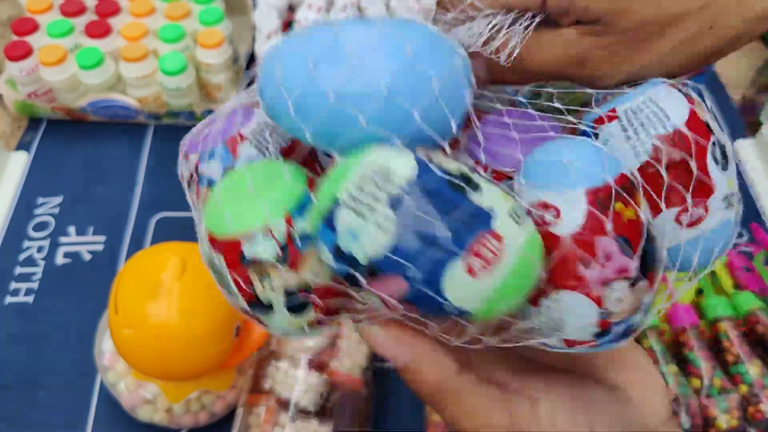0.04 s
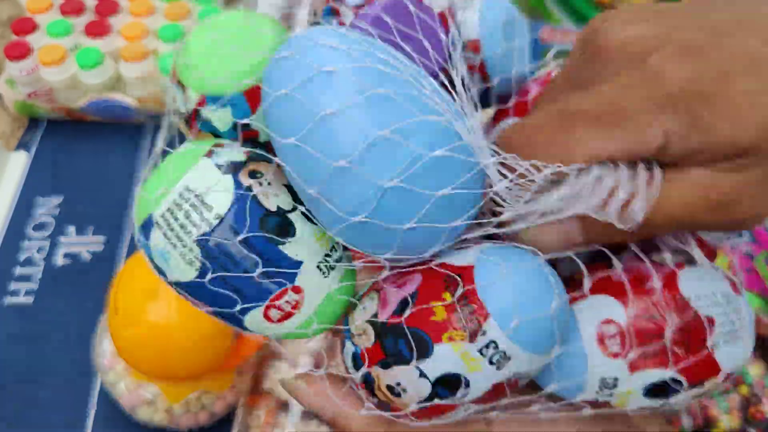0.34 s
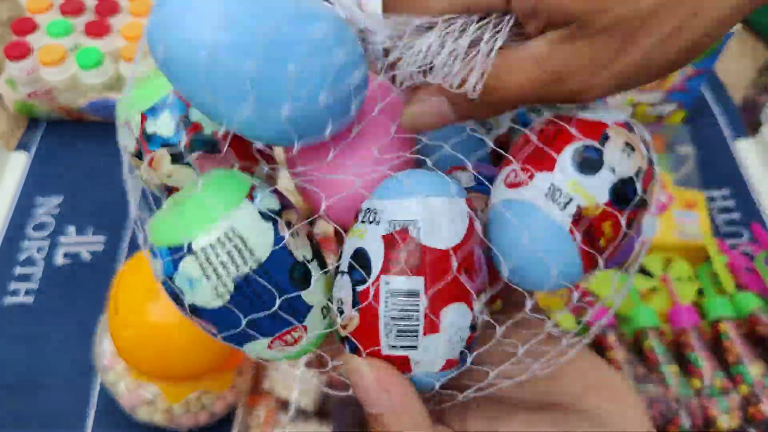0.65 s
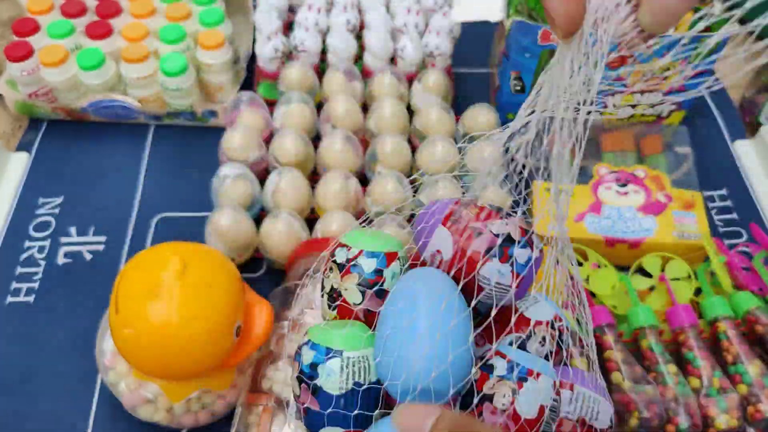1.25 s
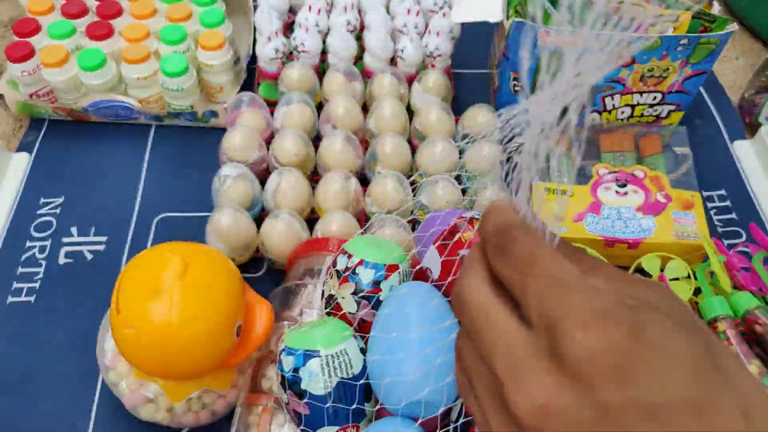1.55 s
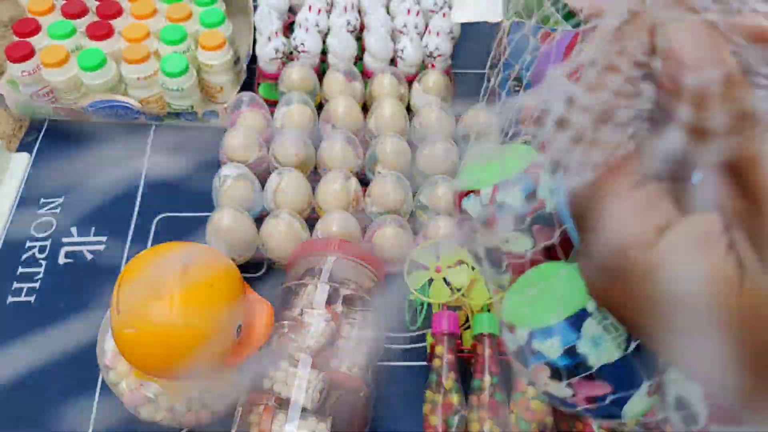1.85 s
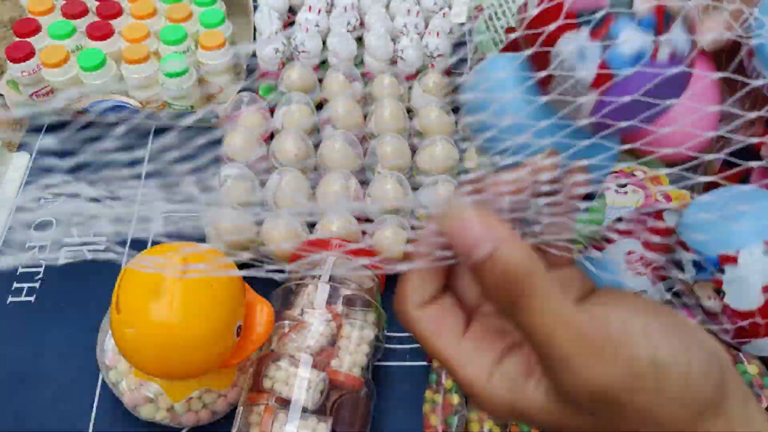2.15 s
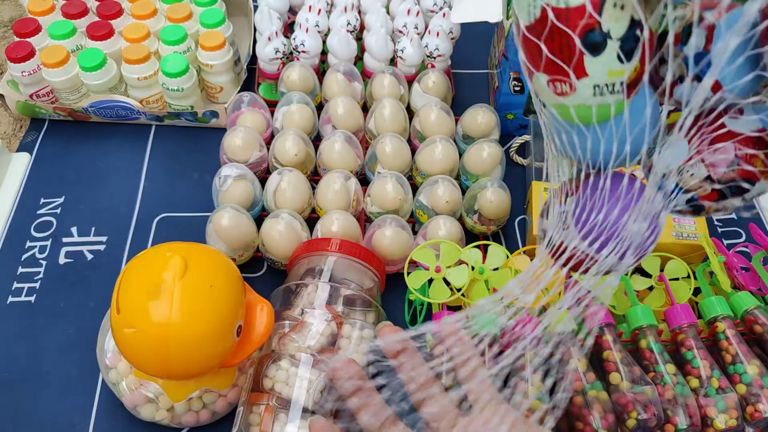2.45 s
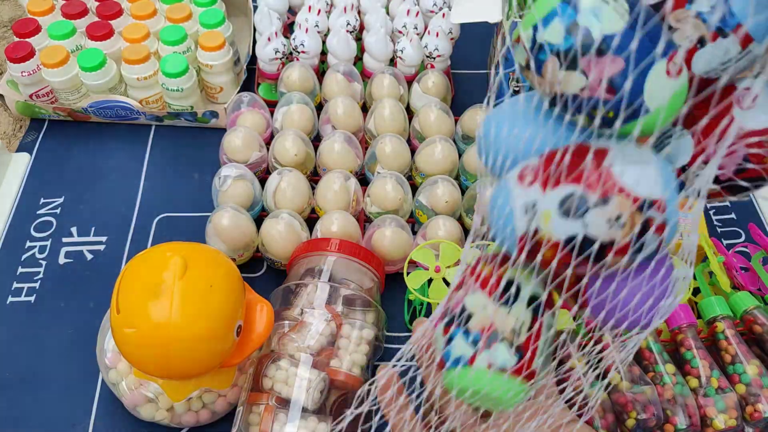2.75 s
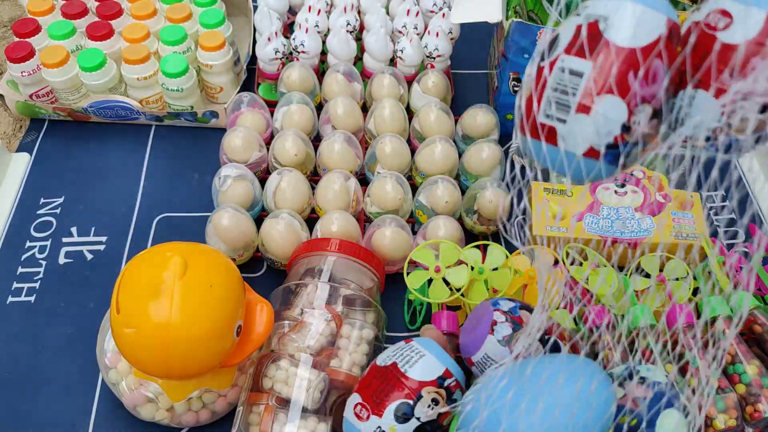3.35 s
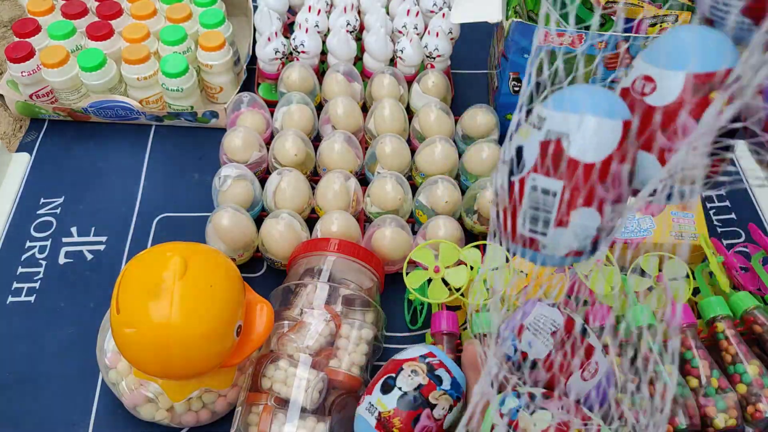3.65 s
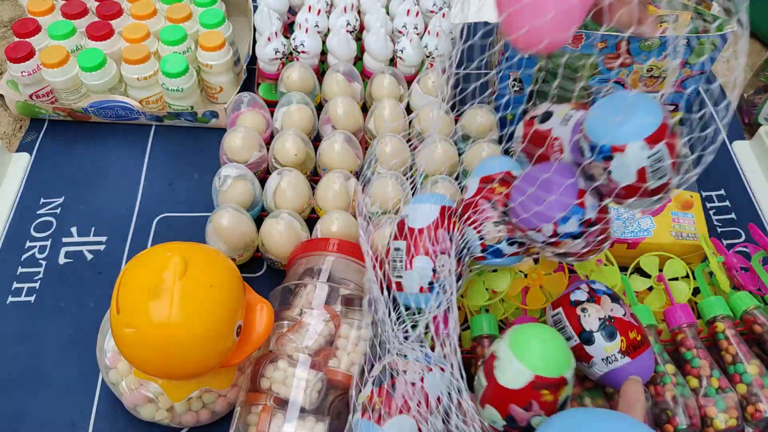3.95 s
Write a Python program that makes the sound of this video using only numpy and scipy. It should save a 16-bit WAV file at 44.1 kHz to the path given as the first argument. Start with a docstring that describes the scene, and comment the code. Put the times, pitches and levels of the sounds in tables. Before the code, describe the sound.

Hollow plastic eggs clack and rattle in a rustling mesh bag, close up in a quiet room. The knocking is densest and loudest for the first 0.8 seconds, with soft bumps underneath. Another short rustle comes around 1.2 seconds, then a lull. From about 1.9 seconds, lighter clicks and crackling mesh continue, with a sharper clack and scrape near 3.5 seconds and faint squeaks until 4 seconds.

```python
"""Plastic eggs in a mesh bag

Hollow plastic eggs are jostled close to the microphone, set down, then lifted and shaken down the net.
Shells clack, rattle and squeak against each other; mesh and wrappers scrape and crackle over them in
tiny slips. The bag bumps softly against hands and table in a quiet room."""
import sys
import numpy as np
from scipy import signal
from scipy.fft import rfft, irfft
from scipy.io import wavfile
from scipy.ndimage import uniform_filter1d

SR = 44100
rng = np.random.default_rng(int(sys.argv[2]) if len(sys.argv) > 2 else 0)


def materialize(psi):
    """Save the field psi as 16-bit PCM at rate SR to the path in sys.argv[1].

    A 1-D psi becomes a single channel; in a 2-D psi each row is a channel.
    """
    bounded = np.clip(np.atleast_2d(psi).T, -1, 1)
    quanta = np.round(bounded * 32767).astype(np.int16)
    wavfile.write(sys.argv[1], SR, quanta)


N = 176400

# Shell-on-shell hits: start_s, shell_db, pitch_hz, thud_db, tick_db
CLACKS = [(0.0176, -28, 1720, -48, -39), (0.0255, -28, 2900, -43, -31), (0.0351, -30, 2660, -45, -34),
          (0.0712, -19, 2240, -29, -16.5), (0.0964, -24.5, 1870, -27, -25.5), (0.1536, -24, 2220, -41, -34),
          (0.1607, -17.5, 2100, -29, -16.5), (0.1668, -29, 1720, -25, -25), (0.1841, -19.5, 1640, -26, -18),
          (0.1907, -21, 1730, -28.5, -22.5), (0.2484, -25, 2220, -36, -21), (0.2652, -16.5, 1610, -19, -21),
          (0.2755, -18.5, 2840, -18.5, -18), (0.3032, -30, 3430, -29, -28), (0.3562, -25, 3370, -31, -22.5),
          (0.372, -24, 1550, -32, -20), (0.3825, -25, 2160, -23.5, -32), (0.4249, -34, 3150, -54, -24.5),
          (0.4447, -23.5, 2280, -37, -21.5), (0.4579, -20.5, 2980, -28, -26),
          (0.4931, -24.5, 2430, -26, -26), (0.5084, -25, 1700, -41, -23), (0.5563, -22, 2270, -23, -21),
          (0.577, -21.5, 2280, -25, -18), (0.6004, -26.5, 3400, -35, -33), (0.6227, -33, 2690, -33, -16.5),
          (0.6383, -36, 1930, -50, -21), (0.65, -25, 3100, -36, -29), (0.663, -26, 1500, -28, -34),
          (0.6719, -18, 2200, -30, -32), (0.6778, -28, 1250, -24.5, -38), (0.7128, -20.5, 1740, -24.5, -25),
          (0.7663, -18, 1950, -23.5, -20), (0.7757, -20, 1674, -28, -22), (0.8313, -33.5, 2560, -50, -29),
          (0.8468, -34, 3160, -48, -26), (0.9521, -27.5, 1764, -37.5, -28.5),
          (0.9612, -34, 1640, -38.5, -38), (0.9768, -35, 1820, -37, -48), (1.0106, -30, 2150, -37, -32),
          (1.1034, -32, 3160, -40, -31), (1.153, -33, 3200, -47, -30), (1.1785, -42, 3180, -48, -37),
          (1.3394, -31, 2620, -38, -34.5), (1.4912, -35.5, 2210, -48, -36.5),
          (1.9275, -44, 1850, -40.5, -38), (1.969, -37, 2840, -55, -39), (2.0551, -35.5, 1380, -42, -34),
          (2.1036, -33, 2080, -34, -41), (2.211, -31.5, 2050, -55, -32.5), (2.3458, -34, 1555, -47, -46),
          (2.5078, -51, 1600, -58, -35.5), (2.6495, -32.5, 2910, -34, -32.5),
          (2.7166, -30.5, 1010, -41, -34.5), (2.7376, -28.5, 1090, -36.5, -46),
          (2.7749, -36, 1970, -33.5, -48), (2.8432, -40, 1710, -35.5, -51), (2.9214, -30, 2820, -57, -31.5),
          (2.9356, -25, 2250, -45, -29), (2.9497, -52, 1700, -53, -30.5), (2.9779, -34, 1970, -53, -40),
          (2.9898, -33.5, 1670, -35.5, -34.5), (3.0602, -28.5, 2200, -31.5, -33.5),
          (3.1282, -33.5, 3220, -36, -35.5), (3.1451, -39, 3100, -52, -34.5),
          (3.159, -30.5, 2765, -38, -37), (3.1963, -41.5, 1690, -42.5, -44), (3.227, -38, 2690, -48, -43),
          (3.2614, -38, 1970, -46.5, -39.5), (3.3953, -31, 3070, -45.5, -36), (3.4724, -22, 2100, -48, -37),
          (3.841, -34, 2960, -50, -34.5), (3.8704, -39, 3250, -47, -40), (3.8889, -41.5, 3300, -55, -40),
          (3.919, -42, 2000, -62, -36.5)]
# Modes of a hollow egg: pitch_ratio, level_db, t60_s
EGG_MODES = [(.71, -6, .022), (.86, -8, 0.018), (1, 5, .023), (1.24, -10, .018), (1.47, -13, .016),
             (1.75, -15, .014)]
# Fader rides for the sliding load: time_s, shells_db, mesh_db
SLIDE_LEVELS = [(0.0, -42.5, -40), (0.03, -35, -37.5), (0.06, -36.5, -34), (0.08, -26, -30),
                (0.14, -38, -39.5), (0.27, -21, -21.5), (0.32, -28.5, -33), (0.38, -24, -24.5),
                (0.41, -34.5, -35), (0.45, -23, -23), (0.52, -32, -33), (0.54, -24.5, -25),
                (0.61, -28, -29), (0.64, -27, -23), (0.66, -29, -31), (0.75, -29, -30),
                (0.78, -24.5, -28.5), (0.83, -41, -43), (0.87, -36, -34.5), (0.92, -42, -43),
                (0.95, -41, -42), (1.0, -48, -50), (1.08, -50, -47), (1.1, -49, -52), (1.14, -57, -63),
                (1.242, -26.5, -29.5), (1.37, -36, -40), (1.41, -48, -50.5), (1.49, -47, -56),
                (1.62, -70, -65), (1.689, -55.5, -52), (1.73, -66.5, -70.5), (1.911, -68, -69),
                (1.931, -48, -49.5), (1.98, -43.5, -45), (2.05, -41, -49.5), (2.06, -34, -35),
                (2.14, -38.5, -40), (2.37, -42, -39.5), (2.47, -43, -40.5), (2.71, -51, -47),
                (2.72, -40.5, -43), (3.07, -42.5, -42), (3.12, -48.5, -44), (3.17, -44, -43),
                (3.19, -50, -53), (3.38, -59, -53), (3.41, -40.5, -41.5), (3.46, -45, -46),
                (3.49, -34, -32.5), (3.522, -33, -31), (3.55, -56, -56), (3.61, -44, -45.5),
                (3.63, -60, -52.5), (3.68, -56, -55), (3.721, -41, -42.5), (3.76, -48, -49),
                (3.86, -43, -47), (3.89, -54, -64), (3.94, -43.5, -40), (4.0, -64, -56)]
# Single strands snapping over a shell: start_s, pitch_hz, level_db
STRAND_SNAPS = [(.8438, 6500, -17), (.8635, 7000, -23), (1.1422, 7000, -22), (2.1505, 6000, -27),
                (2.405, 9500, -21), (2.5585, 5000, -27), (2.961, 5200, -21), (3.2665, 7500, -27),
                (3.858, 6000, -26)]
# The bag landing on hands and table: start_s, length_s, pitch_hz, level_db
BAG_BUMPS = [(0.079, .03, 205, -36), (.175, 0.014, 263, -28.5), (.25, 0.054, 282, -35),
             (0.362, .03, 340, -31), (0.441, 0.069, 326, -35), (0.538, .04, 380, -34),
             (0.577, 0.038, 257, -33), (0.655, .012, 230, -30), (0.76, 0.019, 480, -33),
             (1.175, 0.019, 274, -41.5), (1.234, .018, 387, -28.5), (1.262, 0.02, 300, -33),
             (1.339, 0.0089, 302, -31.5), (1.367, 0.02, 297, -41), (1.547, 0.013, 276, -45.5),
             (1.68, 0.021, 260, -50), (1.923, .032, 230, -39), (2.078, 0.026, 213, -37.5),
             (2.42, 0.074, 230, -45), (2.782, 0.013, 520, -42), (3.01, 0.03, 377, -42),
             (3.719, .008, 313, -37)]
# Shells rubbed until they sing: start_s, length_s, pitch_hz, level_db
SHELL_SQUEAKS = [(.777, .018, 1720, -26), (3.498, .022, 2200, -39), (3.568, .008, 2210, -39),
                 (3.603, .016, 2170, -43), (3.772, .03, 3180, -48), (3.857, .025, 3130, -48),
                 (3.974, .012, 2140, -41)]
# Mesh dragged over a shell: start_s, length_s, pitch_hz, level_db
MESH_CREAKS = [(2.07, .12, 540, -48), (2.39, .08, 520, -48), (2.745, .14, 950, -41), (3.02, .06, 700, -44)]
# Midrange bite of a clack: frequency_hz, gain_db
CRACK_EQ = [(600, -28.5), (1100, -3), (1800, 3), (3000, -1.5), (4200, -7), (6000, -22), (14000, -40)]
# Low body of a clack: frequency_hz, gain_db
THUD_EQ = [(80, -13), (200, -2.5), (480, 0.5), (1000, 2.5), (1500, -11.5), (3000, -35.5)]
# Bright edge of a clack: frequency_hz, gain_db
TICK_EQ = [(2500, -22), (4500, -4), (6000, 2), (8300, -2), (10000, -8), (12500, -17), (16000, -20)]
# Hollow colour of scraping shells: frequency_hz, gain_db
SCRAPE_EQ = [(100, -22), (250, -8), (400, -8), (530, -2), (750, -7.5), (1020, -2.5), (1300, -4), (1700, 1),
             (2200, 1.5), (2600, 1), (3100, 1), (4000, -5.5), (6000, -18), (14000, -40)]
# Crisp colour of the mesh: frequency_hz, gain_db
MESH_EQ = [(2500, -9), (4200, -.5), (5500, .3), (7000, -.5), (8300, -1.7), (9500, -5.5), (12000, -15),
           (16000, -23)]
# Dark colour of the room's background: frequency_hz, gain_db
ROOM_TONE_EQ = [(20, -8), (60, 4), (120, -4), (250, -8), (500, -16), (1000, -19), (2500, -26), (6000, -36),
                (16000, -58)]
# Position of the bag: time_s, left_over_right_db
BAG_PAN = [(0, 2), (1.1, 2.5), (1.4, .5), (2.8, 0), (3.2, 1), (4, .5)]
# Resonances of the microphone ports, left then right: centre_hz, width_hz, level_db
MIC_PORTS = [(7850, 1300, 3), (6750, 1100, 1)]

# Layer trims, added to the levels in the tables
RING_DB, CRACK_DB, THUD_DB, TICK_DB = -3, -4.2, -2.3, -2.6
SCRAPE_DB, RATTLE_DB, RUSTLE_DB, CRACKLE_DB, RUB_DB = -4.2, -6.5, -5, -9.5, -2.5

CRACK_T60_S, THUD_T60_S, TICK_T60_S, SLIP_T60_S = .012, .009, .014, .0065
IMPULSE_DB, BURST_TAIL_DB, BURST_TAIL_T60_S = 3.5, -17, .02
RUB_ATTACK_S, RUB_RELEASE_S, RUB_HOLD_SHARE = .0029, .005, .7
EGG_HZ = 2000  # reference pitch for mode decay and crack colour
STEREO_SPLIT_HZ = 3200  # above this the two microphones hear unlike sound


def shell_clacks(size=3072):
    """Egg hits egg: a sharp crack rings the shell, with a short thud below and a bright tick on top."""
    out, t = np.zeros((2, N)), np.arange(size) / SR
    thud_ir, tick_ir = eq_impulse(THUD_EQ), eq_impulse(TICK_EQ)
    level_attack = lambda x: x / rms(x[:, :int(.006 * SR)])
    for start, shell_db, hz, thud_db, tick_db in CLACKS:
        colour_shift = (hz / EGG_HZ) ** .25  # the crack loosely follows the shell's pitch
        crack_ir = eq_impulse([(f * colour_shift, db) for f, db in CRACK_EQ])
        ring = undb(RING_DB) * level_attack(shell_ring(t, hz))
        crack = undb(CRACK_DB) * level_attack(convolve(impact(t, CRACK_T60_S), crack_ir))
        thud = undb(THUD_DB + thud_db) * level_attack(convolve(impact(t, THUD_T60_S), thud_ir))
        tick = undb(TICK_DB + tick_db) * level_attack(convolve(impact(t, TICK_T60_S), tick_ir))
        clack = undb(shell_db) * (ring + crack) + thud + tick
        add(out, pan(clack, start, offset_db=2 * rng.standard_normal()), start)
    return out


def shell_ring(t, hz):
    """A struck egg rings in modes that vary from hit to hit; higher shells die away sooner."""
    ring, decay_scale = 0, (EGG_HZ / hz) ** .8
    for ratio, db, t60 in EGG_MODES:
        detune, strength, skew = rng.standard_normal(3)
        mode_hz = hz * ratio * (1 + .2 * (ratio - 1) * detune)
        stereo_phase = np.array([[1], [-1]]) * skew * mode_hz / STEREO_SPLIT_HZ
        envelope = undb(db + 2 * strength) * decay(t, t60 * decay_scale)
        ring = ring + envelope * np.sin(2 * np.pi * mode_hz * t + stereo_phase)
    return ring


def impact(t, t60):
    """The raw transient of a hit: an impulse and a noise burst with a faint tail."""
    envelope = decay(t, t60) + undb(BURST_TAIL_DB) * decay(t, BURST_TAIL_T60_S)
    return undb(IMPULSE_DB) * (t == 0) + stereo_noise(len(t)) * envelope


def sliding_load():
    """Shells scrape and rattle while the mesh rustles and crackles over them."""
    t = np.arange(N) / SR
    times, shells_db, mesh_db = np.array(SLIDE_LEVELS).T
    shell_slips = slips(per_s=1400, scatter_db=3.9)
    mesh_slips = slips(per_s=1700, scatter_db=3.9) + undb(-6) * shell_slips  # shells jerk the mesh too
    scrape = colour(shell_slips, SCRAPE_EQ)
    rustle = colour(mesh_slips, MESH_EQ)
    rattle = colour(pops(per_s=190, low_hz=1400, high_hz=3900, cycles=16), SCRAPE_EQ)
    crackle = colour(pops(per_s=130, low_hz=5500, high_hz=11000, cycles=28), MESH_EQ)
    shells = (undb(SCRAPE_DB) * scrape + undb(RATTLE_DB) * rattle) * undb(np.interp(t, times, shells_db))
    mesh = (undb(RUSTLE_DB) * rustle + undb(CRACKLE_DB) * crackle) * undb(np.interp(t, times, mesh_db))
    return pan(shells + mesh, t)


def slips(per_s, scatter_db, size=N):
    """Stick and slip: a dense train of tiny cracks of very unequal size, even in mean strength."""
    hits = rng.random(size) < per_s / SR
    energy = hits * undb(scatter_db * np.minimum(rng.exponential(size=size), 4)) ** 2
    energy = signal.lfilter([1], [1, -decay(2 / SR, SLIP_T60_S)], energy) + 1e-3
    energy = energy / uniform_filter1d(energy, int(.09 * SR))
    return stereo_noise(size) * np.sqrt(energy)


def pops(per_s, low_hz, high_hz, cycles, spread_db=18):
    """A scatter of tiny contacts, most of them weak, each at its own pitch."""
    out = np.zeros((2, N))
    for when, pitch, weakness in rng.random((int(per_s * N / SR), 3)):
        hz = low_hz * (high_hz / low_hz) ** pitch
        add(out, undb(-spread_db * np.sqrt(weakness)) * pop(hz, cycles), when * N / SR)
    return out


def pop(hz, cycles, grit=.9, size=1024):
    """One tiny contact: a gritty, pitched click that falls 60 dB over the given cycles."""
    t = np.arange(size) / SR
    stereo_phase = np.array([[1], [-1]]) * rng.standard_normal() * hz / STEREO_SPLIT_HZ
    tone = np.sin(2 * np.pi * hz * t + stereo_phase)
    return decay(t, cycles / hz) * (tone + grit * stereo_noise(size))


def strand_snaps():
    """Taut strands let go one at a time, each with a bright pop."""
    out = np.zeros((2, N))
    for start, hz, db in STRAND_SNAPS:
        add(out, pan(undb(db) * pop(hz, cycles=28), start), start)
    return convolve(out, eq_impulse(MESH_EQ))


def rubs(cues, width, size=8192):
    """Lasting contacts: slips drive one resonance, broad when cushioned, narrow when a shell sings."""
    out, t = np.zeros((2, N)), np.arange(size) / SR
    f = np.fft.rfftfreq(size, 1 / SR) + 1
    for start, length, hz, db in cues:
        resonance = 1 / (1 + 1j * (f / hz - hz / f) / width) ** 2
        attack = np.minimum(t / RUB_ATTACK_S, 1)
        release = np.exp(-np.maximum(t - RUB_HOLD_SHARE * length, 0) / RUB_RELEASE_S)
        friction = slips(per_s=700, scatter_db=2.5, size=size)
        rub = attack * release * irfft(rfft(friction) * resonance)
        rub /= rms(rub[:, :int((length + RUB_RELEASE_S) * SR)])
        add(out, pan(undb(db + RUB_DB) * rub, start), start)
    return out


def room_reverb(x, level_db=-13, t60_s=.15, predelay_s=.005):
    """A faint, short tail from the walls."""
    t = np.arange(SR // 2) / SR
    tail = rng.standard_normal((2, len(t))) * decay(t, t60_s) * (t > predelay_s)
    return undb(level_db) * convolve(x, tail / np.sqrt(np.sum(tail ** 2) / 2))


def room_tone(level_db=-56.5, spread=.6):
    """The low, steady noise bed of the room."""
    noise = rng.standard_normal(N) + spread * rng.standard_normal((2, N))
    return undb(level_db) * colour(noise, ROOM_TONE_EQ, size=4096)


def pan(x, when, offset_db=0, lag_s_per_db=.00004):
    """The bag is louder and earlier in the nearer, left microphone."""
    db = np.interp(when, *np.array(BAG_PAN).T)
    lag_samples = max(int(round(np.mean(db) * lag_s_per_db * SR)), 0)
    gain = undb((db + offset_db) / 2)
    return np.array([x[0] * gain, np.roll(x[1], lag_samples) / gain])


def stereo_noise(size):
    """White noise, centred in the bass and wide in the treble."""
    likeness = 1 / (1 + (np.fft.rfftfreq(size, 1 / SR) / STEREO_SPLIT_HZ) ** 2)
    spectra = rfft(rng.standard_normal((2, size)))
    mid, side = irfft(spectra * np.sqrt([1 + likeness, 1 - likeness]), size)
    return np.array([mid + side, mid - side]) / np.sqrt(2)


def eq_impulse(curve, size=1024):
    """Minimum-phase impulse response of an EQ curve."""
    hz, db = np.array(curve).T
    f = np.maximum(np.fft.rfftfreq(size, 1 / SR), 1)
    gain = undb(np.interp(np.log(f), np.log(hz), db))
    cepstrum = irfft(np.log(gain))
    cepstrum[1:size // 2] *= 2
    cepstrum[size // 2 + 1:] = 0
    return irfft(np.exp(rfft(cepstrum)))[None]


def colour(x, curve, size=1024):
    """Apply an EQ curve and normalise to unit RMS."""
    shaped = convolve(x, eq_impulse(curve, size))
    return shaped / rms(shaped)


def convolve(x, ir):
    """Filter both channels with an impulse response."""
    return signal.fftconvolve(x, ir, axes=1)[:, :x.shape[1]]


def add(out, x, start):
    """Mix x into out at a time in seconds."""
    i = max(int(start * SR), 0)
    out[:, i:i + x.shape[1]] += x[:, :N - i]


def decay(t, t60):
    """Exponential fade, 60 dB down at t60."""
    return np.exp(-np.log(1000) * t / t60)


def undb(db):
    """Decibels to gain."""
    return 10 ** (np.asarray(db) / 20)


def rms(x):
    """Root mean square."""
    return np.sqrt(np.mean(x ** 2)) + 1e-12


def scene():
    """The bag of eggs in its room."""
    bag = shell_clacks() + strand_snaps() + sliding_load()
    bag += rubs(BAG_BUMPS, width=.9) + rubs(SHELL_SQUEAKS, width=.12) + rubs(MESH_CREAKS, width=1.2)
    return bag + room_reverb(bag) + room_tone()


def record(dry, top_hz=15200):
    """Each microphone port rings in the treble; the recorder rounds the peaks and cuts the top."""
    channels = []
    for x, (hz, width_hz, db) in zip(dry, MIC_PORTS):
        port_ring = signal.lfilter(*signal.iirpeak(hz, hz / width_hz, fs=SR), x)
        channels.append(x + undb(db) * port_ring)
    high_cut = signal.ellip(8, .2, 80, top_hz, fs=SR, output="sos")
    return signal.sosfilt(high_cut, np.tanh(channels))


dry = scene()
out = record(dry)
materialize(out)
```